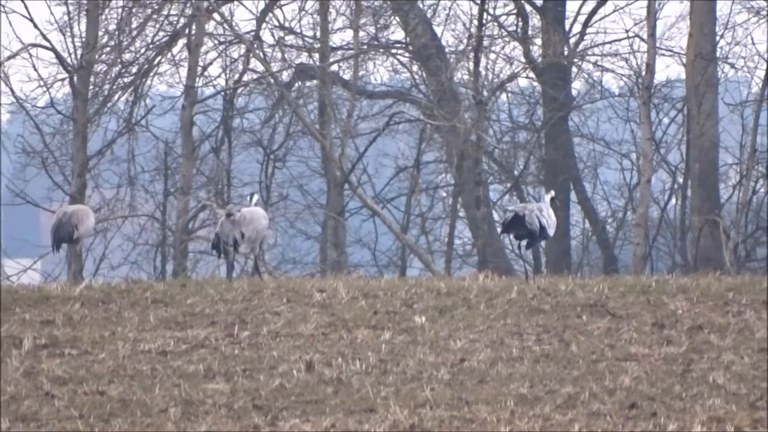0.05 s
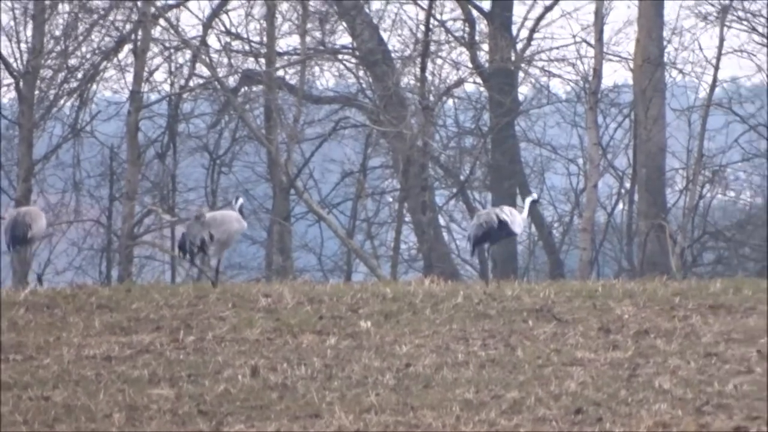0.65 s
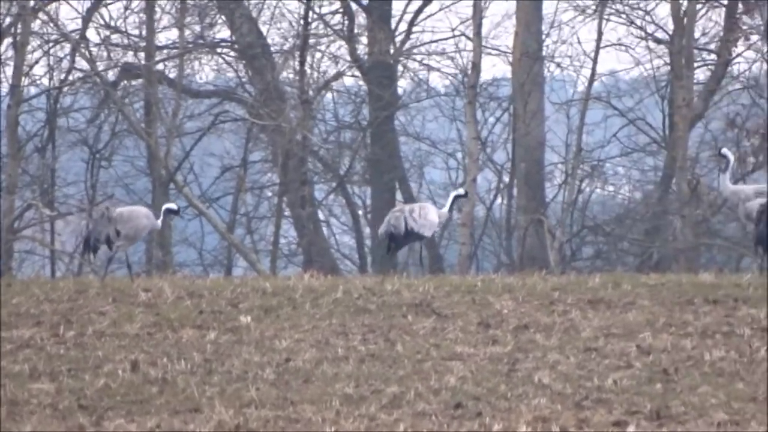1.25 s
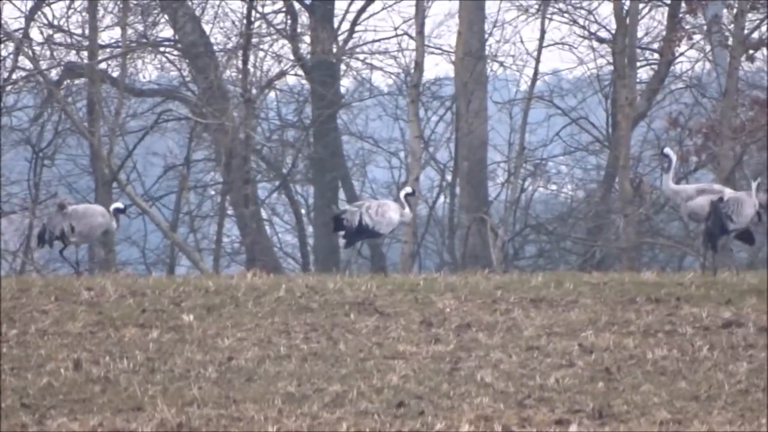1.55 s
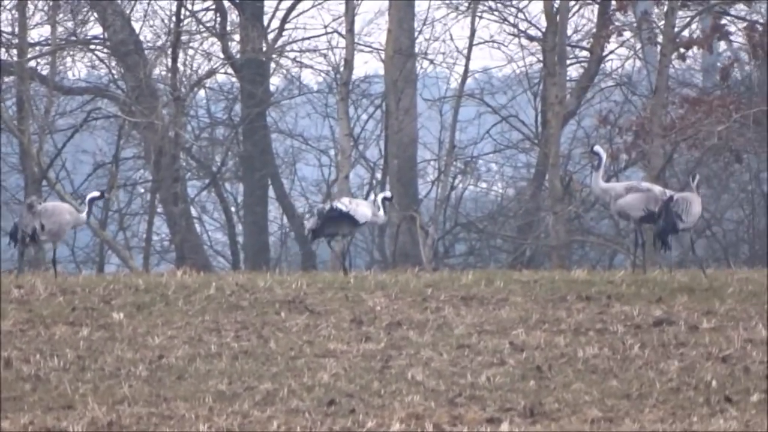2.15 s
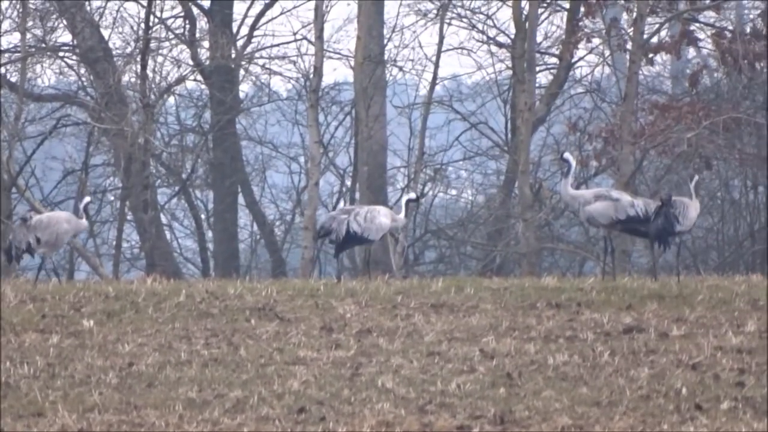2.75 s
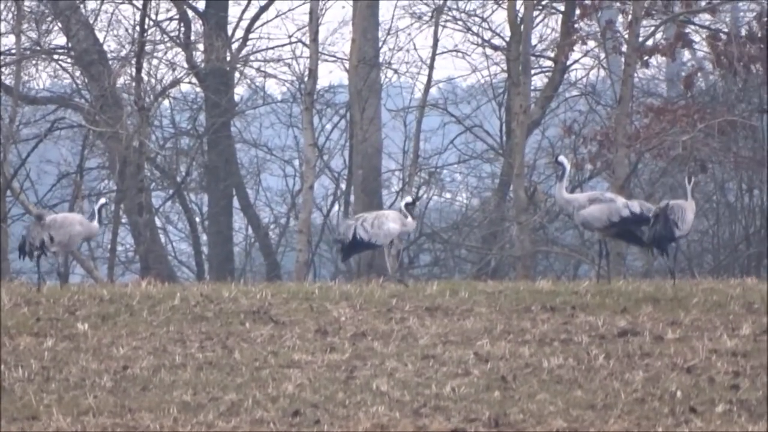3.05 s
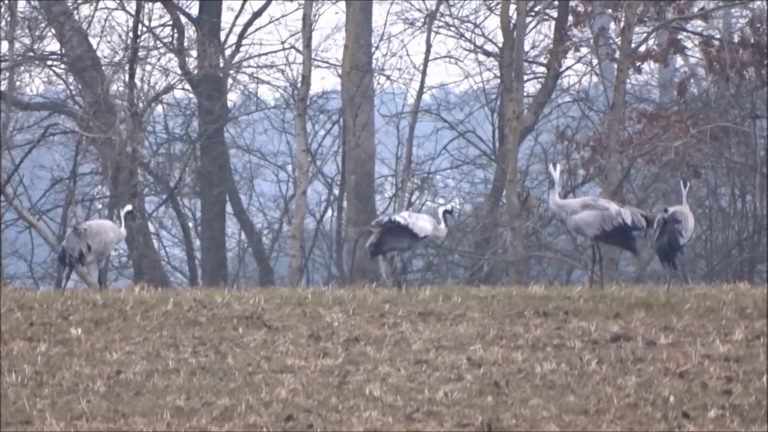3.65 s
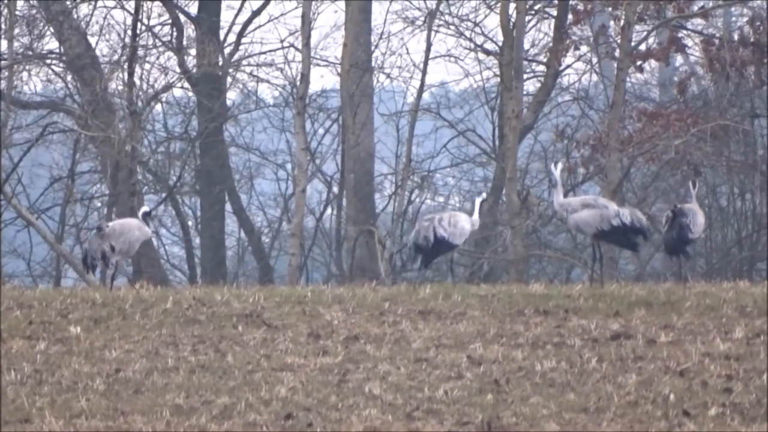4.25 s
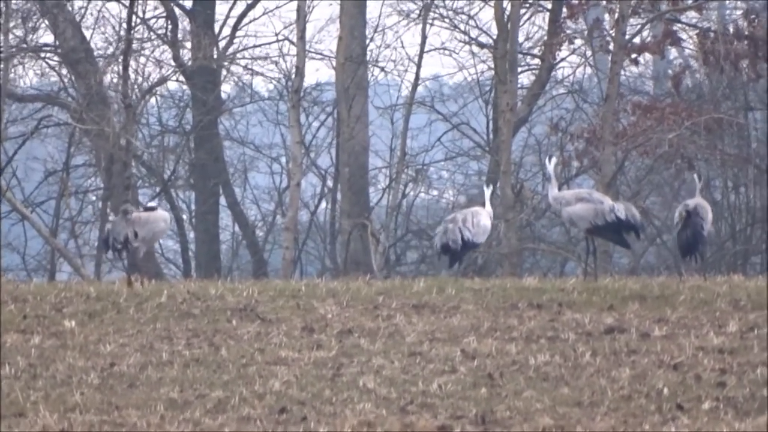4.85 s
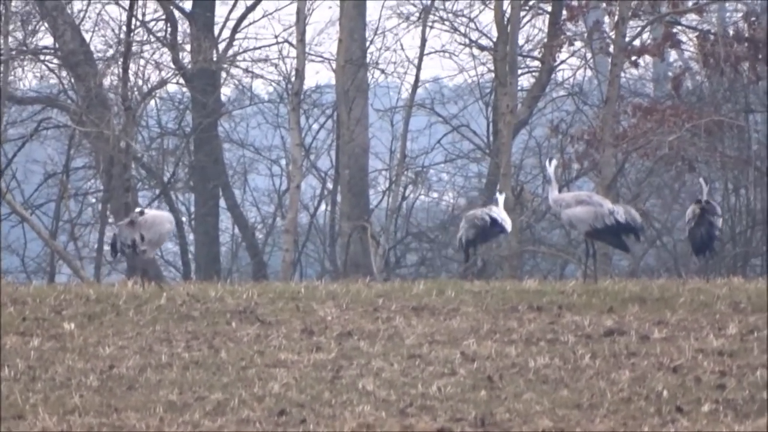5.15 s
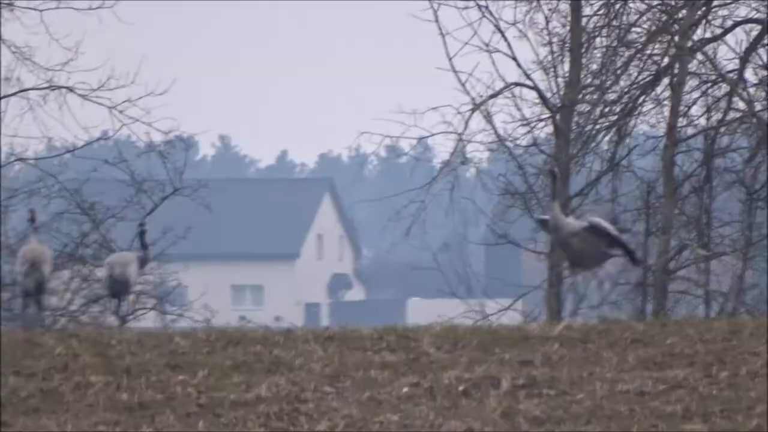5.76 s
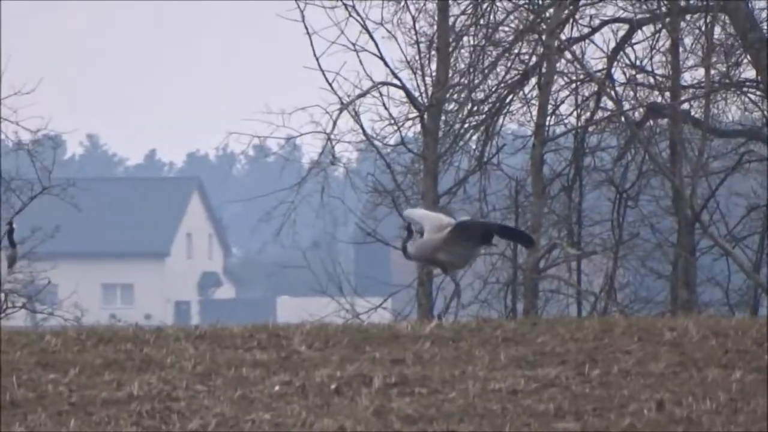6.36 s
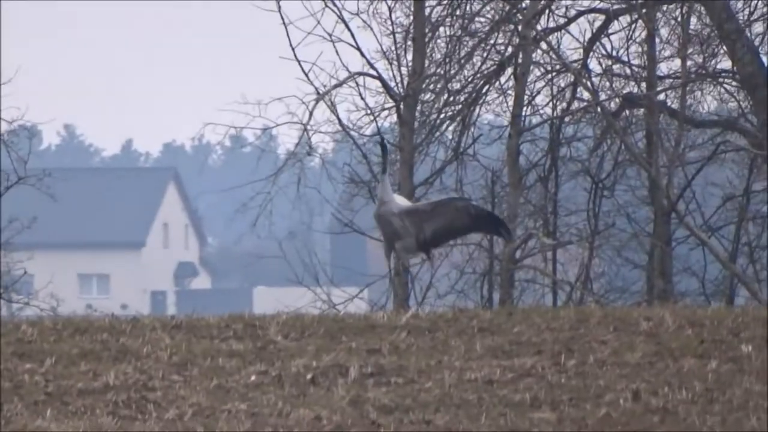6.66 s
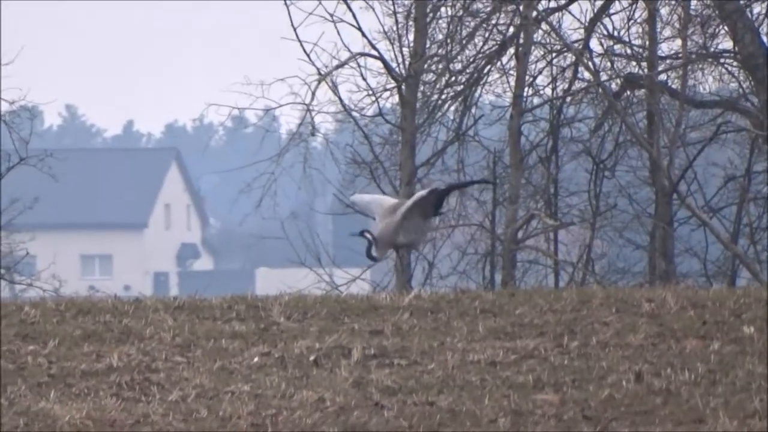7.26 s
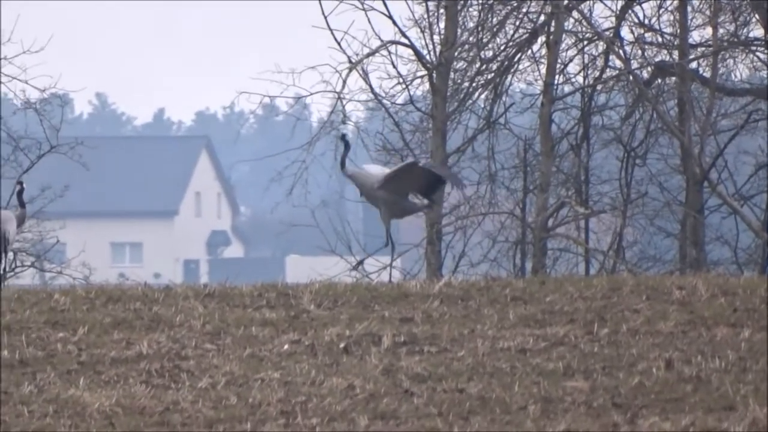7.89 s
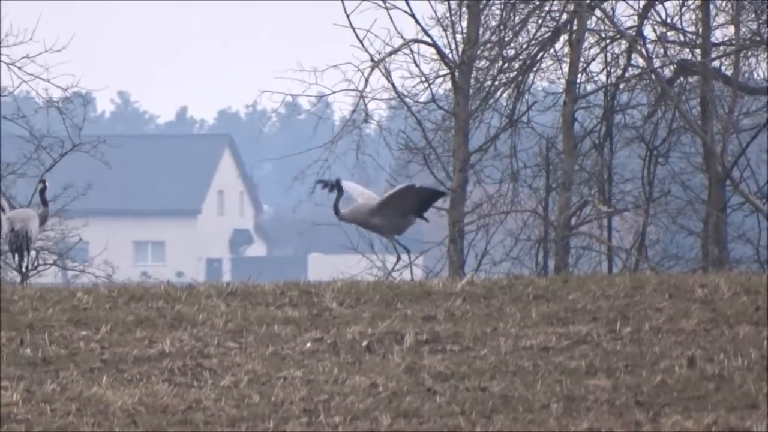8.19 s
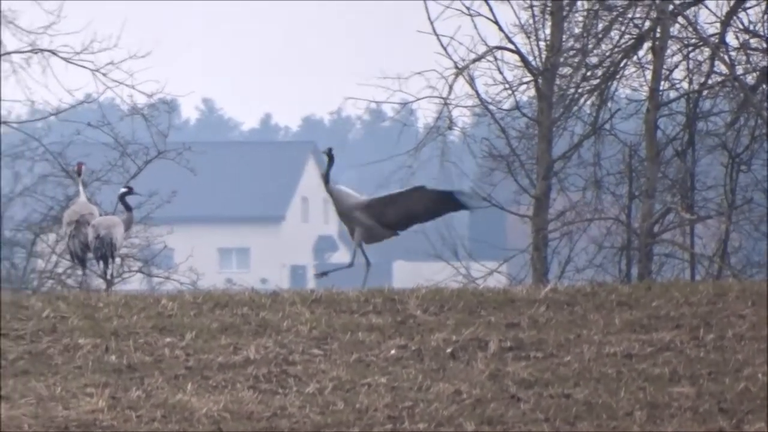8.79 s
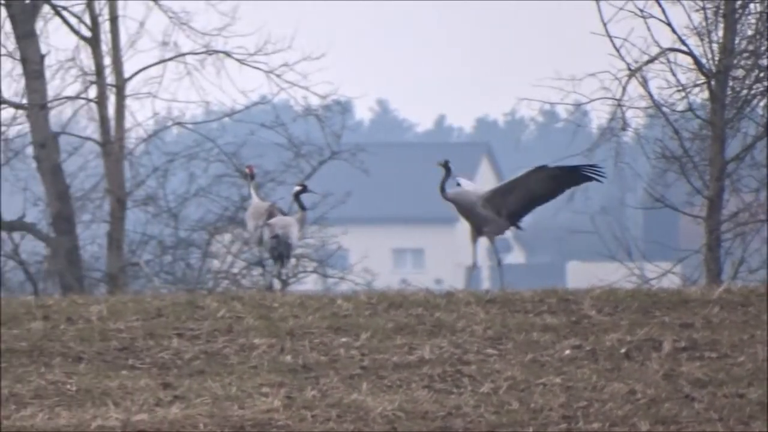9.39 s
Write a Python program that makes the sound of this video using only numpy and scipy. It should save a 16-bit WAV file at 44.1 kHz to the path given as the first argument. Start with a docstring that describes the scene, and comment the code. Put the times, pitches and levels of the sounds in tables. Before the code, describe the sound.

Outdoors in an open field, wind hits the microphone with a deep, fluttering rumble and irregular thumps. Behind it, faint chirps and trills of a small bird sound over far bare trees and a thin hiss. Past the middle there is a dry tick, the twittering stops and the wind briefly drops. Strong gusts then buffet on to the end, nearly covering a single short, distant bird whistle.

```python
"""Gusty wind on a camera microphone at the edge of an open field. From the start, turbulence and shed vortices
rumble at the ports, over far bare trees and camera hiss. A small songbird twitters in gliding tones for the
first six seconds, and a second bird gives a few low rising peeps in the first 1.5 s. From 0.26 s come buffets,
each led by a rasping eddy. At 5.8 s, a dry tick; at 6.07 s, a faint, scratchy falling one. At 7.55 s, amid
strong gusts, a far bird gives a thin whistle."""
import sys
import numpy as np
from scipy import signal
from scipy.fft import rfft, irfft, next_fast_len
from scipy.io import wavfile
from scipy.ndimage import uniform_filter1d

SR = 44100
rng = np.random.default_rng(int(sys.argv[2]) if len(sys.argv) > 2 else 0)


def dump_mix(stems):
    """Bounce the given channels to the path in sys.argv[1] as a 16-bit WAV at rate SR."""
    frames = np.atleast_2d(stems).T  # one column per channel
    limited = np.clip(frames, -1, 1)  # hard clip at full scale
    pcm = np.round(limited * 32767).astype(np.int16)
    wavfile.write(sys.argv[1], SR, pcm)


N = 420273
T = np.arange(N) / SR
HZ = np.fft.rfftfreq(N, 1 / SR)

# breeze at the microphone: t/s, strength/dB
BREEZE_DB = [(0.0, -64), (0.3, -64.5), (0.62, -47.5), (1.55, -66), (1.9, -53), (2.18, -55), (2.55, -42),
             (3.2, -48), (4.4, -42), (4.74, -51), (4.95, -44.5), (5.7, -45.5), (6.05, -60), (6.65, -49),
             (7.08, -63), (7.3, -38.5), (8.35, -38), (8.6, -47.5), (9.53, -40)]
# buffets on the breeze: t/s, hold/s, strength/dB, eddy rasp/dB
WIND_BUFFETS = [(0.26, 0.0065, -47, -73), (0.446, 0.042, -40, -71), (0.57, 0.1, -41.5, -60),
                (0.74, 0.012, -37.5, -62), (0.864, 0.035, -46, -70), (0.96, 0.014, -47, -72),
                (1.119, 0.041, -45.5, -75), (1.715, 0.012, -47, -79), (2.001, 0.03, -44, -76),
                (2.092, 0.023, -42.5, -74), (2.307, 0.018, -38, -56), (2.393, 0.011, -36.5, -59),
                (2.511, 0.021, -36.5, -53), (2.568, 0.0085, -35.5, -50.5), (2.675, 0.064, -33, -54),
                (2.785, 0.022, -28.5, -50.5), (3.061, 0.061, -36, -58), (3.28, 0.022, -41, -70),
                (3.442, 0.17, -34.5, -65), (3.748, 0.016, -39.5, -54), (3.848, 0.03, -34.5, -54),
                (3.94, 0.026, -37.5, -67), (4.333, 0.023, -29, -42.5), (4.425, 0.038, -32, -48),
                (4.532, 0.099, -40.5, -52.5), (4.809, 0.011, -36, -73), (5.397, 0.024, -33, -56),
                (5.54, 0.026, -29, -46), (5.643, 0.038, -27, -52), (5.703, 0.017, -24.5, -45),
                (5.786, 0.01, -30, -45), (5.905, 0.0077, -45.5, -69.5), (6.335, 0.017, -46.5, -76),
                (6.443, 0.025, -40, -75), (6.55, 0.017, -42.5, -69), (6.656, 0.16, -44, -71),
                (7.007, 0.012, -49.5, -68), (7.281, 0.054, -30.5, -43), (7.406, .01, -38.5, -44.5),
                (7.448, 0.018, -27.5, -32), (7.535, 0.026, -29, -31), (7.793, 0.025, -28, -41),
                (7.875, .07, -33, -60), (8.116, 0.017, -35, -62), (8.158, .02, -28.5, -50),
                (8.215, 0.077, -35.5, -45), (8.313, 0.014, -26.5, -45), (8.36, 0.028, -28.5, -52),
                (8.483, 0.035, -28, -45), (8.651, 0.041, -26.5, -44), (8.823, 0.046, -33, -39),
                (9.024, 0.052, -38, -61), (9.125, 0.027, -35.5, -65), (9.24, 0.014, -34.5, -62),
                (9.289, 0.042, -35.5, -63), (9.493, .03, -33, -42)]
# side the wind strikes: t/s, left minus right/dB
WIND_LEAN_DB = [(0.0, 0.5), (1.9, 0.5), (2.3, -4), (2.8, -2.5), (3.6, 1.3), (4.2, -1.5), (5.35, -0.5),
                (5.7, -5), (6.1, 0), (7.3, -0.9), (8.1, -1.5), (8.7, -1.5), (9.53, -1.5)]
# turbulence spectrum: f/Hz, relative density/dB
RUMBLE_SPECTRUM = [(15, -3.5), (40, 0), (75, 4.5), (110, 1.5), (150, -2.5), (195, -5.5), (240, -10.5),
                   (330, -20), (430, -26.5), (620, -38.5), (1000, -46.5), (1500, -59), (3000, -100)]
# turbulence width: f/Hz, side minus mid/dB
RUMBLE_WIDTH = [(22, -20), (65, -9.5), (110, -9), (190, 0), (380, 4.5), (1300, 2.5)]
# eddy rasp spectrum: f/Hz, relative density/dB
RASP_SPECTRUM = [(150, -29), (300, 16.5), (500, 4.5), (800, -5.5), (1200, -19.5), (2000, -51), (4000, -51)]
# tree line spectrum: f/Hz, relative density/dB
TREE_SPECTRUM = [(150, -16), (300, -6), (470, 6), (590, 0.5), (750, 4), (920, -0.5), (1150, -4),
                 (1500, -8.5), (1800, -4.5), (2250, -4), (3100, -8), (4000, -9.5), (5500, -17), (8000, -30)]
# tree line width: f/Hz, side minus mid/dB
TREE_WIDTH = [(200, -8), (380, 0.5), (700, 0.5), (1400, 5), (1800, 1.5), (2300, 3), (3200, 1), (4500, -1),
              (8000, 1)]
# tree line roar: t/s, level/dB
ROAR_DB = [(0.0, -64), (0.8, -61), (1.6, -63.5), (2.7, -61.5), (3.4, -63.5), (3.9, -57.5), (4.5, -60.5),
           (5.3, -59.5), (5.8, -57.5), (6.1, -63), (7.1, -62), (8.0, -61.5), (9.53, -57)]
# swell driving twig rustle and hiss: t/s, relative level/dB
SWELL_DB = [(0.05, -66), (1.2, -66), (1.5, -67.5), (2.7, -65.5), (4.64, -63.5), (5.41, -65), (5.8, -62.5),
            (5.83, -66.5), (6.8, -66.5), (7.85, -65), (8.87, -63), (9.48, -63.5)]
# camera hiss spectrum: f/Hz, relative density/dB
HISS_SPECTRUM = [(3000, -16.5), (6000, -16), (7200, -9), (8000, -10.5), (9000, -6.5), (11000, -4),
                 (13200, -1), (14200, -2), (15500, 0)]
# camera hiss width: f/Hz, side minus mid/dB
HISS_WIDTH = [(5000, -7), (8000, -5.5), (12000, -9), (14500, -11), (16000, -49)]
# camera whines: f/Hz, level/dB
WHINES = [(13200, -84), (15625, -85)]
# second bird, low rising peeps: t/s, level/dB, middle f/Hz
LOW_PEEPS = [(0.008, -67.5, 1560), (0.255, -71, 1560), (0.437, -64.5, 1420), (1.485, -68, 1155)]
# plain notes: t/s, length/s, level/dB, start f/Hz, middle f/Hz, end f/Hz
SONG_CHIRPS = [(0.231, 0.12, -70, 4470, 4030, 3750), (0.472, 0.082, -69, 4550, 4200, 3900),
               (0.716, 0.062, -68, 3700, 4400, 4100), (0.769, 0.016, -67, 3030, 3040, 3000),
               (1.888, 0.1, -70.5, 4010, 3880, 3880), (2.015, 0.041, -75.5, 4850, 4500, 4430),
               (2.214, 0.08, -74.5, 4190, 4680, 4000), (2.304, .095, -70, 4060, 3980, 4260),
               (3.343, 0.023, -64, 3640, 3160, 2500), (3.734, 0.031, -70, 4270, 4680, 5400),
               (3.76, .035, -62.5, 4850, 4300, 4100), (3.99, 0.04, -67.5, 2190, 2580, 3450),
               (4.033, 0.1, -67, 3880, 4100, 4130), (4.151, 0.056, -64, 2650, 2390, 3640),
               (4.211, 0.087, -65, 4297, 4200, 3970), (4.374, 0.036, -66, 2380, 3026, 3450),
               (4.404, 0.093, -61.5, 4170, 4140, 4130), (4.947, 0.12, -57.2, 3970, 3907, 3900),
               (5.114, 0.067, -68.5, 2376, 2950, 3530), (5.52, 0.093, -63, 4034, 3950, 3840)]
# runs of pips: t/s, count, spacing/s, level/dB, start f/Hz, end f/Hz, pitch ratio per pip
SONG_PIP_RUNS = [(0.563, 4, .0205, -60.3, 4060, 3400, 1), (0.793, 3, .025, -64, 2450, 2780, 1),
                 (4.654, 3, .0235, -63.5, 3800, 2650, .87), (5.772, 2, .023, -67, 3700, 2450, .86)]
# trills: t/s, length/s, level/dB, start f/Hz, middle f/Hz, end f/Hz, rate/Hz, depth/Hz
SONG_TRILLS = [(1.102, .31, -73, 4870, 4600, 4500, 62, 110), (1.39, .13, -73.5, 4550, 4540, 4220, 62, 50),
               (2.111, .083, -67, 4040, 4010, 3990, 90, 80), (2.515, .17, -68.5, 3410, 3390, 3350, 36, 110),
               (2.821, .22, -77.5, 4850, 4740, 4700, 62, 100), (3.03, .17, -73, 4700, 4570, 4200, 62, 70),
               (3.313, .036, -64, 3150, 3030, 3000, 140, 380),
               (3.631, .075, -65.5, 3900, 3980, 3990, 85, 130),
               (3.822, .108, -63, 4220, 4130, 4250, 80, 330),
               (4.559, .085, -66.5, 4100, 4000, 3900, 135, 650),
               (4.825, .125, -71, 5450, 4500, 4060, 40, 130),
               (5.148, .15, -66.5, 3550, 2950, 2000, 90, 120), (5.426, .1, -73, 4650, 4240, 4050, 40, 80)]
# faint, scratchy falling tick: t/s, length/s, level/dB, start f/Hz, middle f/Hz, end f/Hz
SCRATCHY_TICK = (6.072, .028, -70.5, 2100, 1700, 1300)
# far bird's whistle: t/s, f/Hz, level/dB
WHISTLE_CONTOUR = [(7.55, 1140, -66), (7.586, 1200, -61), (7.616, 1254, -61), (7.655, 1193, -61),
                   (7.695, 1236, -62), (7.73, 1279, -59), (7.77, 1186, -56.5), (7.795, 1150, -64)]


def amp(db):
    return 10 ** (np.asarray(db) / 20)


def unit_rms(x):
    return x / np.sqrt(np.mean(x ** 2) + 1e-20)


def lowpass(hz, corner_hz):
    return 1 / (1 + (hz / corner_hz) ** 4)


def spectral_gain(rows):
    """Gain per bin, interpolated over log frequency."""
    hz, db = np.transpose(rows)
    return amp(np.interp(np.log(HZ + 1), np.log(hz + 1), db))


def follow(rows):
    """Time curve at every sample."""
    return np.interp(T, *np.transpose(rows))


def add(mix, at_s, sound):
    part = mix[..., max(round(at_s * SR), 0):][..., :sound.shape[-1]]
    part += sound[..., :part.shape[-1]]


def wander(rate_hz):
    """Smooth random motion, rms 1."""
    steps = rng.standard_normal(N // 64 + 2)
    hz = np.fft.rfftfreq(len(steps), 64 / SR)
    slow = irfft(rfft(steps) * lowpass(hz, rate_hz), len(steps))
    return unit_rms(np.interp(np.arange(N) / 64, np.arange(len(steps)), slow))


def stereo_spectrum(colour, width, lag):
    """Noise spectrum; lag is the share of the side that makes the left port late."""
    a, b, c, d = rng.standard_normal((4, len(HZ)))
    mid, diffuse = a + 1j * b, c + 1j * d
    side = spectral_gain(width) * (-1j * lag * mid + np.sqrt(1 - lag ** 2) * diffuse)
    return np.array([mid + side, mid - side]) * unit_rms(spectral_gain(colour)) * np.sqrt(N / 2)


def to_samples(spectrum):
    """Inverse FFT at a fast size, same pitch and level."""
    size = next_fast_len(N + 1, True)
    nearest = np.minimum(np.round(np.arange(size // 2 + 1) * N / size).astype(int), N // 2)
    return irfft(spectrum[..., nearest], size)[..., :N] * np.sqrt(size / N)


def gusts(attack_s=0.01105, release_s=.021):
    """Wind strength/dB: a fluttering breeze plus buffets that rise, hold and die away."""
    power = np.zeros(N)
    for at_s, hold_s, db, _ in WIND_BUFFETS:
        t = np.arange(-.05, hold_s + .15, 1 / SR)
        envelope = np.exp(np.minimum(t, 0) / attack_s - np.maximum(t - hold_s, 0) / release_s)
        add(power, at_s + t[0], (amp(db) * envelope) ** 2)
    breeze = amp(follow(BREEZE_DB) + 2.5 * wander(rate_hz=10.55))
    flutter = amp(1.14 * wander(rate_hz=17.6))
    return 10 * np.log10(breeze ** 2 + power * flutter ** 2)


def rumble(gust_db, level_db=-40, lumps_db=2.5):
    """Lumpy turbulence on the ports; stronger gusts shed smaller, higher eddies."""
    flow = stereo_spectrum(RUMBLE_SPECTRUM, RUMBLE_WIDTH, lag=0.24)
    strength_db = gust_db + 37 + lumps_db * wander(rate_hz=32)
    high = 1 - lowpass(HZ + 1, corner_hz=210)
    deep = lowpass(HZ, corner_hz=65)
    bands = [(deep, .6), (1 - high - deep, 1), (high, 1.553)]
    wind = sum(to_samples(flow * band) * amp(growth * strength_db) for band, growth in bands)
    return wind * amp(level_db)


def vortices(gust_db, gain_db=-9, lumps_db=4, shed_hz=108, octaves_per_db=.014):
    """Vortices peel off the housing in short, near-regular trains, faster in strong gusts."""
    octaves = octaves_per_db * (gust_db + 37) + .2 * wander(rate_hz=13.96)
    phase = 2 * np.pi * np.cumsum(shed_hz * 2 ** octaves) / SR
    ports = [np.sin(phase + 1.1 * wander(rate_hz=26)) * amp(lumps_db * wander(rate_hz=59))
             for _ in range(2)]
    return np.array(ports) * amp(gust_db + gain_db)


def trees(flicker_db=1.35):
    """Wind in the far tree line: dull roar and twig rustle, swelling slowly."""
    rush = stereo_spectrum(TREE_SPECTRUM, TREE_WIDTH, lag=.55)
    low = lowpass(HZ + 1, corner_hz=1500)
    roar_db = follow(ROAR_DB) + 0.1 + flicker_db * wander(rate_hz=2.5)
    rustle_db = 0.97 * (follow(SWELL_DB) + 67) - 66 + flicker_db * wander(rate_hz=27)
    return to_samples(rush * low) * amp(roar_db) + to_samples(rush * (1 - low)) * amp(rustle_db)


def camera_noise(flicker_db=.3):
    """The camera's own bright, unsteady hiss and two faint steady whines."""
    hiss_db = 1.11 * (follow(SWELL_DB) + 68) - 65.5 + flicker_db * wander(rate_hz=15)
    hiss = to_samples(stereo_spectrum(HISS_SPECTRUM, HISS_WIDTH, lag=0.13)) * amp(hiss_db)
    return hiss + sum(amp(db) * np.sqrt(2) * np.sin(2 * np.pi * hz * T) for hz, db in WHINES)


def jitter_pair(count, span):
    """Two noises smoothed over span samples, rms near 1."""
    return uniform_filter1d(rng.standard_normal((2, count)), span, mode="wrap") * np.sqrt(span)


def glide(length_s, db, start_hz, middle_hz, end_hz, trill_hz=0, depth_hz=0, edge_s=.02):
    """Tone gliding through three pitches; in a trill, pitch and level swing together, then settle."""
    t = np.arange(int(length_s * SR)) / SR
    u = t / length_s
    drift, haste = jitter_pair(len(t), span=256)
    trill_phase = 2 * np.pi * trill_hz * np.cumsum(1 + .15 * haste) / SR
    swing = 1 - .7 * u ** 2
    glide_hz = start_hz * (1 - u) * (1 - 2 * u) + 4 * middle_hz * u * (1 - u) + end_hz * u * (2 * u - 1)
    hz = (glide_hz + depth_hz * swing * np.sin(trill_phase)) * (1 + .007 * drift)
    # wide sweeps and deep trills turn rough
    rough = min(.05 + 2.5 * (abs(end_hz - start_hz) + depth_hz) / middle_hz, .45)
    a, b = jitter_pair(len(t), span=80)
    tone = (np.exp(2j * np.pi * np.cumsum(hz) / SR) * (1 + rough * (a + 1j * b))).real
    arch = signal.windows.tukey(len(t), min(2 * edge_s / length_s, .7)) * (1 + .4 * np.sin(np.pi * u))
    throb = 1 + .55 * swing * np.cos(trill_phase)
    return amp(db) * unit_rms(arch * throb * tone)


def outdoors(x, pan_left_db=1.4, late_s=.000025, wet_db=-10, t60_s=.33):
    """A far source reaches the left port slightly late; trunks scatter a faint tail."""
    t = np.arange(SR // 2) / SR
    tail = rng.standard_normal((2, len(t))) * amp(-60 * t / t60_s) * (t > .012)
    tail /= np.linalg.norm(tail[0])
    direct = np.array([np.interp(T - late_s, T, x) * amp(pan_left_db), x * amp(-pan_left_db)])
    return direct + amp(wet_db) * signal.fftconvolve(x[None], tail, axes=1)[:, :N]


def windborne(x, gain_db=0.5, flutter_db=1.2):
    """A far sound flutters as the wind carries it."""
    return outdoors(x * amp(gain_db + flutter_db * wander(rate_hz=60)))


def birdsong(trill_gain_db=1.1, pip_s=.014, peep_s=.038, peep_rise=0.283):
    """The songbird's chirps, trills and runs of pips, and a second bird's low peeps, each a gliding tone."""
    song = np.zeros(N)
    for at_s, *shape in SONG_CHIRPS:
        add(song, at_s, glide(*shape))
    for at_s, *shape in SONG_TRILLS:
        add(song, at_s, amp(trill_gain_db) * glide(*shape))
    for at_s, count, spacing_s, db, start_hz, end_hz, ratio in SONG_PIP_RUNS:
        glide_hz = np.array([start_hz, (start_hz + end_hz) / 2, end_hz])
        for k in range(count):
            add(song, at_s + k * spacing_s, glide(pip_s, db, *(glide_hz * ratio ** k)))
    for at_s, db, hz in LOW_PEEPS:
        add(song, at_s, glide(peep_s, db, hz * (1 - peep_rise), hz, hz * (1 + peep_rise)))
    return song


def eddies(median_hz=125, push_s=.008, rasp_s=0.012, rasp_gain_db=-1, delay_s=0.0048):
    """An eddy leads each buffet: a few pressure swings, uneven between the ports, and a short rasp."""
    pressure, rasp_envelope = np.zeros((2, N)), np.zeros(N)
    t = np.arange(-.04, .04, 1 / SR)
    push = np.exp(-(t / push_s) ** 2)
    for at_s, _, db, rasp_db in WIND_BUFFETS:
        detune, turn, skew = rng.standard_normal(3)
        hz = median_hz * np.exp(0.33 * detune)
        phase = 2 * np.pi * (hz * t + turn) + np.array([[-.5], [.5]]) * skew
        start_s = at_s + delay_s + t[0]
        add(pressure, start_s, amp(db) * push * np.sin(phase))
        add(rasp_envelope, start_s, amp(rasp_db + rasp_gain_db) * np.exp(-(t / rasp_s) ** 2))
    return pressure + rasp_envelope * to_samples(stereo_spectrum(RASP_SPECTRUM, RUMBLE_WIDTH, lag=0.2))


def dry_tick(at_s=5.81, peak_db=-33, decay_s=0.00064):
    """One small decaying pulse."""
    pulse, t = np.zeros(N), np.arange(400) / SR
    add(pulse, at_s, amp(peak_db) * np.exp(-t / decay_s))
    return pulse


def scratchy_tick():
    """A faint, short, scratchy tick, falling in pitch."""
    tick = np.zeros(N)
    at_s, *shape = SCRATCHY_TICK
    add(tick, at_s, glide(*shape))
    return tick


def far_whistle(waver=0.00806, edge_s=0.014):
    """A far bird on the left: one thin tone with two soft arches of pitch."""
    times_s, hz, db = np.transpose(WHISTLE_CONTOUR)
    pitch_hz = np.interp(T, times_s, hz) * (1 + waver * wander(rate_hz=90))
    gate = np.clip(np.minimum(T - times_s[0], times_s[-1] - T) / edge_s, 0, 1)
    call = gate * amp(np.interp(T, times_s, db)) * np.sin(2 * np.pi * np.cumsum(pitch_hz) / SR)
    return outdoors(call, pan_left_db=6.5, late_s=0.00028, wet_db=-6.0, t60_s=0.32)


def scene(veer_db=0.9):
    """Wind, mostly harder on the right port, over the faint sources."""
    gust_db = gusts()
    lean_db = follow(WIND_LEAN_DB) + veer_db * wander(rate_hz=8)
    port_gains = amp(lean_db * np.array([[.5], [-.5]]))
    wind = (rumble(gust_db) + vortices(gust_db) + eddies()) * port_gains
    bed = trees() + camera_noise()
    return wind + bed + windborne(birdsong() + scratchy_tick()) + dry_tick() + far_whistle()


def record(dry, cutoff_hz=15750):
    """The recorder's band limit."""
    taps = signal.firwin(801, cutoff_hz, window=("kaiser", 9), fs=SR)
    return signal.oaconvolve(dry, taps[None], "same")


dry = scene()
out = record(dry)
dump_mix(out)
```